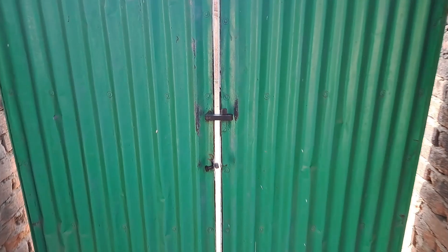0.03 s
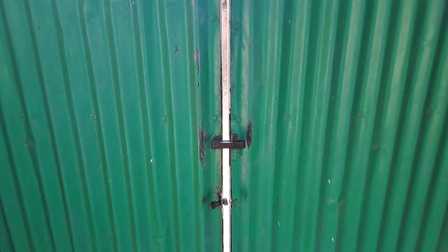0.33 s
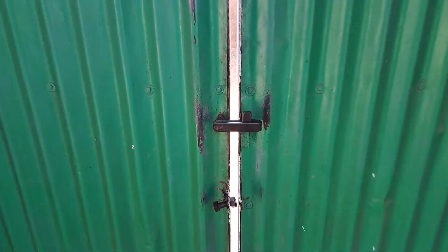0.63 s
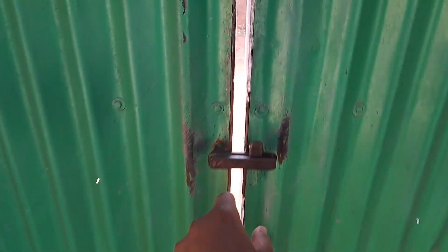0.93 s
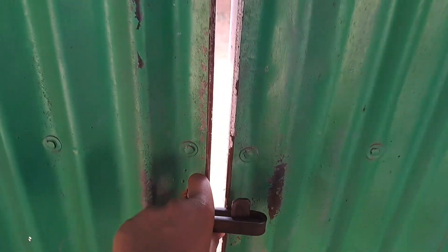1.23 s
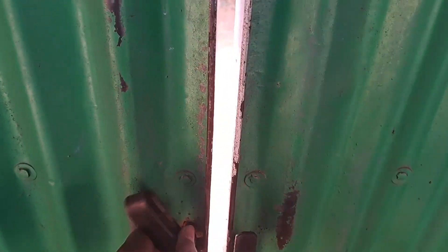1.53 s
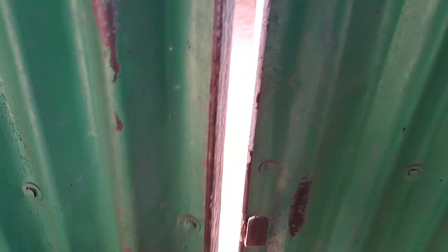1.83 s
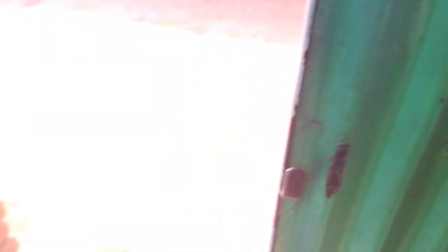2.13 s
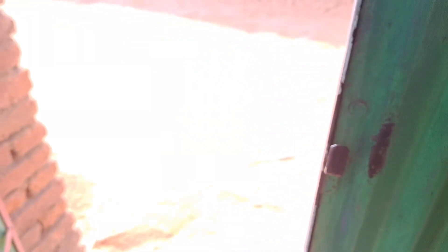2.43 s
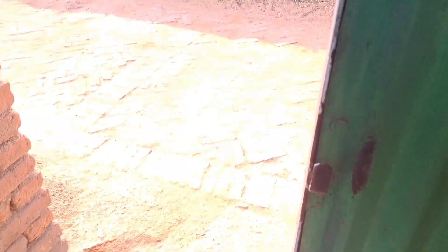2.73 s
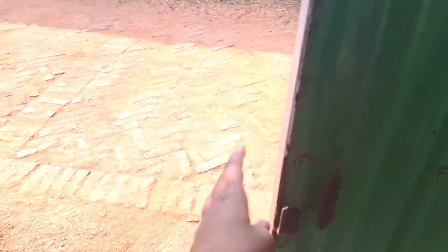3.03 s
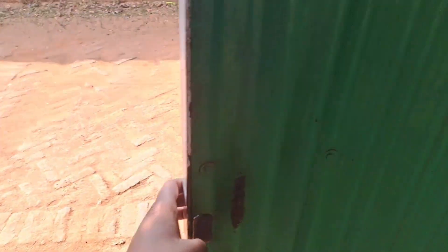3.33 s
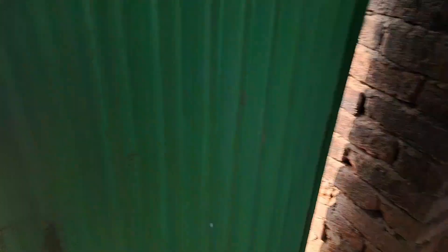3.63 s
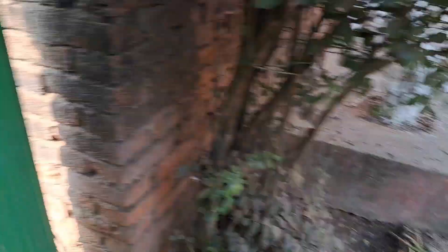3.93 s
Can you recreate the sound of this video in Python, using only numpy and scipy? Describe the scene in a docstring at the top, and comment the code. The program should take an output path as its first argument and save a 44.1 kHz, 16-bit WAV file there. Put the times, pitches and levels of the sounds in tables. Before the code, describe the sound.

A sheet-metal gate is opened close by in a quiet yard. After a soft step, its bolt scrapes and clacks free, the dry hinges squeal at high pitches, and the panel knocks and booms as it swings wide.

```python
"""A sheet-metal gate in a brick yard, close to a stereo microphone and mostly to its right.
Clothes rustle in quiet air and a soft step lands. The bolt scrapes and clacks, the corrugated leaf
booming with each knock, then groans free and leaves the leaf ringing. The dry hinges, squeaking at
first, now squeal and jump between a few high pitches. Last, the leaf is pushed wide and shudders
on its frame under one more squeal."""
import sys
import numpy as np
from scipy import signal
from scipy.fft import rfft, irfft
from scipy.io import wavfile

SR = 44100
rng = np.random.default_rng(int(sys.argv[2]) if len(sys.argv) > 2 else 0)


def log_audio(samples):
    """Write samples as a 16-bit WAV file to the path given in sys.argv[1]."""
    # one column per channel
    frames = np.atleast_2d(samples).T
    # limit to full scale, then quantise
    limited = np.clip(frames, -1, 1)
    pcm = np.round(limited * 32767).astype(np.int16)
    wavfile.write(sys.argv[1], SR, pcm)


N = 4 * SR
TOP_HZ = 15950  # upper band limit of the recorder


def amp(db):
    """Decibels to gain."""
    return 10 ** (np.asarray(db) / 20)


def unit(x):
    """Scales to rms 1."""
    return x / np.sqrt(np.mean(x ** 2) + 1e-20)


def curve_at(points, hz):
    """Reads a curve on a log-frequency axis."""
    f, value = np.transpose(points)
    return np.interp(np.log(hz + 1), np.log(f + 1), value)


def add(mix, s, sound):
    """Mixes a sound in at time s."""
    part = mix[..., round(s * SR):][..., :sound.shape[-1]]
    part += sound[..., :part.shape[-1]]


def wander(n, hz):
    """Smooth random drift, up to about hz."""
    lowpass = 1 / (1 + (np.fft.rfftfreq(N, 1 / SR) / hz) ** 4)
    return unit(irfft(rfft(rng.standard_normal(N)) * lowpass, N))[:n]


def decay(t, t60):
    """Falls 60 dB in t60 seconds."""
    return np.exp(-np.log(1000) * t / t60)


def die_away(x, ring):
    """Lets each frequency decay with its own ring time."""
    frames = dict(fs=SR, nperseg=512, noverlap=384)
    hz, t, spectra = signal.stft(x, **frames)
    return signal.istft(spectra * decay(t, curve_at(ring, hz)[:, None]), **frames)[1][:, :x.shape[1]]


# likeness of the microphone's two channels: f/Hz, coherence/0-1
COHERENCE = [(60, 0.87), (180, 0.97), (400, 0.78), (950, 0), (2400, 0), (15000, 0)]

def noise(n, colour, lo=1, hi=SR):
    """Coloured noise in a soft-edged band, alike on both channels in the bass."""
    hz = np.fft.rfftfreq(n, 1 / SR) + 1e-3
    left, other = rfft(rng.standard_normal((2, n)))
    same = curve_at(COHERENCE, hz)
    right = same * left + np.sqrt(1 - same ** 2) * other
    band = ((1 + (lo / hz) ** 8) * (1 + (hz / hi) ** 8)) ** -.5
    return unit(irfft(np.array([left, right]) * amp(curve_at(colour, hz)) * band, n))


# spectrum of the open air in the yard: f/Hz, level/dB
AIR_COLOUR = [(15, -52), (25, 0.5), (55, 4), (92, -7), (476, -19.5), (988, -32.5), (1890, -20.5),
              (6920, -23), (9320, -35.5), (16000, -24.5)]

def air():
    """Quiet outdoor air all around the microphone, its level drifting slightly."""
    return amp(-56 + 1.9 * wander(N, hz=3)) * noise(N, AIR_COLOUR)


# rustles on the way to the gate: t/s, length/s, level/dB
RUSTLES = [(0.089, 0.22, -54.5), (0.289, 0.2, -60), (0.486, .28, -53.5)]
# their spectrum: f/Hz, level/dB
RUSTLE_COLOUR = [(600, -20), (2500, 4), (5000, -3.5), (9000, -20), (14000, -31)]

def rustles():
    """Soft, flickering swells of cloth and scuffing soles."""
    out = np.zeros((2, N))
    for s, length, db in RUSTLES:
        n = round(length * SR)
        swell = amp(db + wander(n, hz=24.8)) * np.sqrt(np.hanning(n))
        add(out, s, swell * noise(SR, RUSTLE_COLOUR)[:, :n])
    return out


def clustered(x, spacing_hz=90, ripple_db=3.5):
    """The modes of sheet metal come in clusters, different for each place that is struck."""
    hz = np.fft.rfftfreq(x.shape[1], 1 / SR)
    knots = np.arange(0, SR / 2, spacing_hz)
    ripple = np.interp(hz, knots, rng.standard_normal(len(knots))) * hz / (hz + 4 * spacing_hz)
    return unit(irfft(rfft(x) * amp(ripple_db * ripple), x.shape[1]))


# the boom, clang and clink bands: low f/Hz, high f/Hz
BANDS = [(70, 900), (900, 3000), (3000, 17000)]

def blow(levels_db, colour, ring, attack_s):
    """A crack, then dense ringing; the boom builds at its own pace."""
    t = np.arange(SR) / SR
    boom = 1 - np.exp(-t / (.0011 + attack_s / 2))
    overshoot = amp(-16.5) * np.exp(-abs(t - attack_s) / .008)
    crack = np.minimum(t / attack_s, 1) ** 2 * (1 + overshoot)
    return sum(amp(db) * onset * die_away(clustered(noise(SR, colour, *band)), ring)
               for db, band, onset in zip(levels_db, BANDS, [boom, crack, crack]))


# steps and touches at the gate: t/s, boom/dB, clang/dB, clink/dB
STEPS = [(0.64, -33, -50.5, -47), (0.69, -38, -53, -51.5), (0.897, -61, -63, -52.5),
         (1.149, -30.5, -58, -60), (1.193, -31, -45.5, -49.5)]
# their spectrum: f/Hz, level/dB
STEP_COLOUR = [(40, -3.5), (240, -3.5), (450, -7), (3000, -19), (16000, -40)]
# their ring times: f/Hz, t60/s
STEP_RING = [(100, 0.41), (400, 0.098), (2000, 0.21), (14000, 0.71)]

def steps():
    """Soft steps and touches land as dull thuds."""
    out = np.zeros((2, N))
    for s, *levels in STEPS:
        add(out, s, blow(levels, STEP_COLOUR, STEP_RING, attack_s=.0025))
    return out


# rubbing of the bolt, then of the moving leaf: t/s, boom/dB, clang/dB, clink/dB
RUBBING = [(1.131, -50, -69, -64), (1.3, -26.5, -43, -54.5), (1.519, -26.5, -46, -55.5),
           (1.618, -35, -55, -49.5), (1.76, -27.5, -28, -50), (1.87, -41, -56, -60),
           (2.18, -53, -62.5, -54.5), (2.302, -36.5, -40, -40.5), (2.65, -44.5, -74, -64.5),
           (2.851, -54.5, -62.5, -62), (2.97, -49, -56.5, -53.5), (3.145, -51.5, -53.5, -52.5),
           (3.188, -42, -33.5, -27.5), (3.299, -25.5, -39, -45), (3.5, -33.5, -42, -42.5),
           (3.68, -26.5, -39, -47.5), (3.801, -26.5, -45.5, -39.5), (3.88, -31.5, -47, -60),
           (4.0, -36.5, -42, -60)]
# spectrum of the corrugated leaf from close by: f/Hz, level/dB
LEAF_COLOUR = [(24, -38.5), (40, -1), (100, -10.5), (243, -4.5), (455, -10), (1090, -23), (2100, -24),
               (9220, -35.5), (16000, -40)]
# modes of the leaf: f/Hz, level/dB, t60/s
LEAF_MODES = [(168.4, -2, 0.41), (248.7, 2, 0.53), (378, -9.5, 0.31), (472.2, -1, 0.49), (565, -15, 0.42),
              (845, -7, 0.23)]

def rubbing(slips_per_s=1400, spread_db=5.5, smoothing_s=.022):
    """Dense tiny slips keep the sheet rasping and its modes humming while it moves."""
    s, *levels = np.transpose(RUBBING)
    t = np.arange(N) / SR
    strength = amp(spread_db * np.minimum(rng.exponential(1, N), 4))
    slips = (rng.random(N) < slips_per_s / SR) * strength
    energy = signal.lfilter([1], [1, -np.exp(-1 / (smoothing_s * SR))], slips ** 2)
    grain = unit(np.sqrt(energy))
    rasp = sum(amp(np.interp(t, s, db, left=-120)) * grain * clustered(noise(N, LEAF_COLOUR, *band))
               for db, band in zip(levels, BANDS))
    hum = sum(amp(db) * signal.lfilter(*signal.iirpeak(hz, Q=58, fs=SR), rasp)
              for hz, db, _ in LEAF_MODES)
    return amp(-2) * rasp + amp(-3.5) * hum


def ringing(modes, spread_db=5.5):
    """Clear metal modes, excited a little differently by each blow."""
    t = np.arange(SR) / SR
    out = np.zeros((2, SR))
    for hz, db, t60 in modes:
        phase = 2 * np.pi * rng.random() + .5 * rng.standard_normal((2, 1)) * (1 - curve_at(COHERENCE, hz))
        gain = amp(db + spread_db * rng.standard_normal())
        envelope = np.minimum(t * hz / 2, 1) * decay(t, t60)
        out += gain * envelope * np.sin(2 * np.pi * hz * t + phase)
    return out


def impacts(rows, colour, ring, modes, modes_db):
    """Blows on the gate; harder, brighter ones ring the modes more."""
    out = np.zeros((2, N))
    for s, attack_s, boom_db, clang_db, clink_db, *_ in rows:
        hit = blow((boom_db, clang_db, clink_db), colour, ring, attack_s)
        add(out, s, hit + amp(modes_db + (clang_db + clink_db) / 2) * ringing(modes))
    return out


def ping(hz, attack_s, width=.56):
    """A tight cluster of short-lived modes, pitched by where the bolt meets its keeper."""
    t = np.arange(SR) / SR
    cluster = [(hz * (1 - width), -50), (hz, 0), (hz * (1 + width), -50)]
    return noise(SR, cluster) * np.minimum(t / attack_s, 1) * decay(t, t60=.12)


# bolt clacks: t/s, attack/s, boom/dB, clang/dB, clink/dB, ping f/Hz, ping level/dB
CLACKS = [(1.2302, 0.0011, -27, -20.5, -27, 4610, -18), (1.268, 0.0016, -24, -29, -43, 5200, -32.5),
          (1.379, 0.0055, -42, -31, -46.5, 4300, -42), (1.454, 0.00075, -22, -24.5, -25, 5500, -30.5),
          (1.492, 0.0039, -20.5, -22, -27.5, 2170, -21.5), (1.654, 0.0034, -27.5, -28.5, -60, 1900, -38),
          (1.693, 0.0011, -31.5, -22, -34.5, 3950, -30.5), (1.745, 0.0061, -32.5, -20, -28.5, 1860, -27),
          (1.762, 0.0025, -30.5, -19.5, -25, 1690, -22), (2.3579, 0.0013, -30.5, -22.5, -18.5, 1930, -25.5),
          (2.385, 0.0067, -28.5, -24.5, -22, 1960, -20)]
# their spectrum from close by: f/Hz, level/dB
BOLT_COLOUR = [(24, -46.5), (40, -7.5), (433, 0), (990, -7.5), (1370, -17.5), (2150, -18.5), (5180, -15),
               (8550, -27.5), (14800, -34)]
# their ring times: f/Hz, t60/s
BOLT_RING = [(300, 0.85), (800, 0.4), (2000, 0.31), (5000, 0.19)]
# mode of the steel bolt: f/Hz, level/dB, t60/s
BOLT_MODES = [(2055, -3.5, 0.22)]

def bolt_clacks():
    """The bolt knocks along its sleeve and pings on its keeper."""
    out = impacts(CLACKS, BOLT_COLOUR, BOLT_RING, BOLT_MODES, modes_db=-5)
    for s, attack_s, *_, hz, db in CLACKS:
        add(out, s, amp(db) * ping(hz, attack_s))
    return out


def squeal(points, swell_s=.006, tremble=1, third_db=-4.5, stop_s=.004):
    """Stick and slip locks onto a resonance; gives the start time and a trembling, raspy tone."""
    s, hz, db, overtone_db = np.transpose(points)
    t = np.arange(s[0], s[-1] + 4 * stop_s, 1 / SR)
    n = len(t)
    pitch = np.interp(t, s, hz) * (1 + tremble * .0028 * wander(n, hz=120))
    rasp = .01 * wander(n, hz=900)
    phase = 2 * np.pi * np.cumsum(pitch) / SR + rasp
    third = amp(third_db) if 3 * hz.mean() < TOP_HZ else 0
    overtones = np.sin(2 * phase) + third * np.sin(3 * phase)
    tone = amp(np.interp(t, s, db)) * np.sin(phase) + amp(np.interp(t, s, overtone_db)) * overtones
    envelope = np.minimum((t - s[0]) / swell_s, 1) ** 2 * np.exp(-np.maximum(t - s[-1], 0) / stop_s)
    flutter = amp(tremble * 1.2 * wander(n, hz=120))
    return s[0], np.sqrt(2) * tone * envelope * flutter


# reverberation of the brick yard: f/Hz, t60/s
YARD_RING = [(300, 0.27), (5000, 0.34), (14000, 0.2)]

def through_yard(sound, echoes=8):
    """Sound reaches the microphone directly, off the nearby sheet and from the yard."""
    tail = die_away(rng.standard_normal((2, SR)), YARD_RING)
    paths = amp(-12) * unit(tail) / np.sqrt(SR)
    for side in paths:
        delays = rng.integers(60, 900, echoes)
        side[delays] += amp(-8) * rng.choice([-1, 1], echoes) / np.sqrt(echoes)
    paths[0, 0] += amp(-4.5)  # direct sound: softer on the left, a touch later on the right
    paths[1, round(.00045 * SR)] += 1
    return signal.fftconvolve(sound[None], paths, axes=1)[:, :N]


# short squeaks: t/s, length/s, swell/s, first f/Hz, last f/Hz, level/dB, overtone/dB, tremble/0-1
SQUEAKS = [(1.584, .066, .02, 3335, 3260, -21, -50, 1), (1.797, .148, .025, 4025, 4045, -32, -64, .4),
           (2.058, .034, .026, 4925, 4885, -22, -50, 1), (2.22, .07, .025, 715, 700, -42, -62, 1),
           (2.466, .069, .012, 5332, 5322, -27, -54, .4), (2.527, .045, .03, 9760, 10130, -20, -80, 1),
           (3.143, .022, .012, 6240, 6140, -23, -49, 1), (3.2, .036, .022, 4800, 4400, -28, -46, 1)]
# long squeals, one list of points each: t/s, f/Hz, level/dB, overtone/dB
SQUEALS = [
    [(2.196, 4530, -13.5, -28), (2.21, 4495, -19, -29.5), (2.245, 4506, -12.5, -30.5),
     (2.266, 4483, -20.5, -29.5), (2.295, 4518, -14, -24.5), (2.328, 4620, -15.5, -43.5),
     (2.352, 4980, -20, -21)],
    [(2.365, 4900, -18, -28.5), (2.4, 4917, -20, -37), (2.437, 4868, -16.5, -24.5), (2.462, 4925, -25, -31),
     (2.5, 5070, -25.5, -60)],
    [(2.667, 6224, -21.5, -31), (2.69, 6074, -16, -7.5), (2.706, 6004, -16, -20.5), (2.745, 6142, -25, -22),
     (2.79, 6300, -19, -37.5), (2.83, 6378, -22, -27), (2.91, 6280, -18.5, -28.5),
     (2.945, 6214, -26, -22.5), (2.988, 6162, -14.5, -34), (3.014, 6130, -17, -20),
     (3.04, 5920, -31.5, -41)],
    [(3.018, 4920, -49, -58), (3.036, 4960, -23.5, -32), (3.055, 4940, -23.5, -34),
     (3.086, 5027, -20.5, -39), (3.108, 4958, -22, -27), (3.137, 5004, -23, -49)],
    [(3.812, 4390, -20, -47), (3.826, 4320, -23, -28), (3.848, 4410, -34.5, -30.5),
     (3.866, 4197, -12.5, -23), (3.895, 4305, -14.5, -29.5), (3.912, 4280, -21, -32),
     (3.935, 4387, -19, -33), (3.957, 4410, -28.5, -29.5), (3.98, 4505, -11.5, -38),
     (4.0, 4510, -21.5, -32)],
]

def hinges():
    """The dry hinges stick and slip, squeaking and squealing into the yard."""
    out = np.zeros(N)
    for s, length, swell_s, first_hz, last_hz, db, overtone_db, tremble in SQUEAKS:
        glide = [(s, first_hz, db, overtone_db), (s + length, last_hz, db, overtone_db)]
        add(out, *squeal(glide, swell_s, tremble))
    for points in SQUEALS:
        add(out, *squeal(points))
    return through_yard(out)


# groan of the bolt: t/s, f/Hz, level/dB, overtone/dB
GROAN = [(1.743, 616, -28, -37), (1.762, 582.3, -20.5, -30), (1.785, 561, -28, -26), (1.9, 572, -32.5, -49),
         (1.925, 566, -49, -57.5), (1.98, 574, -38.5, -54)]
# modes of the freed leaf: f/Hz, level/dB, t60/s
FREED_MODES = [(786, -28, .5), (910, -28, .4), (1107, -20, .3)]

def bolt_release(free_s=1.762):
    """The bolt groans in its sleeve as it comes free, and the leaf rings on."""
    out = np.zeros((2, N))
    add(out, *squeal(GROAN, third_db=-12))
    add(out, free_s, ringing(FREED_MODES, spread_db=.3))
    return out


# knocks and rasps of the leaf: t/s, attack/s, boom/dB, clang/dB, clink/dB
KNOCKS = [(3.263, 0.01, -17, -26.5, -23), (3.333, 0.012, -20.5, -30, -23.5), (3.392, 0.011, -18, -31, -29),
          (3.464, 0.0052, -25.5, -33, -28), (3.505, 0.004, -26.5, -47, -28.5),
          (3.546, 0.0018, -14.5, -24, -25), (3.573, 0.011, -17.5, -31.5, -36),
          (3.703, 0.0099, -51, -40, -27.5), (3.761, 0.0023, -18, -30, -39),
          (3.913, 0.0091, -57, -61, -30.5)]
# their ring times: f/Hz, t60/s
LEAF_RING = [(100, 0.2), (300, 0.5), (800, 0.36), (2000, 0.32), (5000, 0.17), (14000, 0.095)]

def shudder():
    """Pushed wide, the leaf knocks on its frame and booms."""
    return impacts(KNOCKS, LEAF_COLOUR, LEAF_RING, LEAF_MODES, modes_db=-1.5)


# balance of the gate at the microphone: f/Hz, left minus right level/dB
BALANCE = [(100, 0), (1000, -3), (2400, -9.5), (4500, -9.5), (6300, -14), (9000, -1.5)]

def scene():
    """The gate, close and mostly to the right, over quiet outdoor air."""
    gate = rustles() + steps() + rubbing() + bolt_clacks() + hinges() + bolt_release() + shudder()
    ratio = amp(curve_at(BALANCE, np.fft.rfftfreq(2 * N, 1 / SR)))
    pan = np.array([ratio, np.ones_like(ratio)]) * 2 / (1 + ratio)
    return irfft(rfft(gate, 2 * N) * pan)[:, :N] + air()


def record(dry):
    """The recorder's band limit."""
    lowpass = signal.firwin(511, TOP_HZ, window=("kaiser", 9), fs=SR)
    return signal.oaconvolve(dry, lowpass[None], "same")


dry = scene()
out = record(dry)
log_audio(out)
```